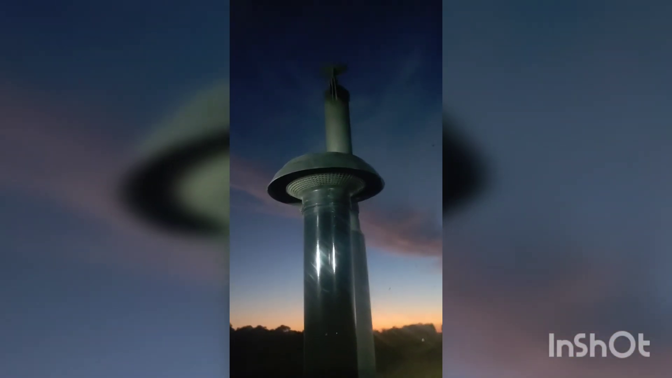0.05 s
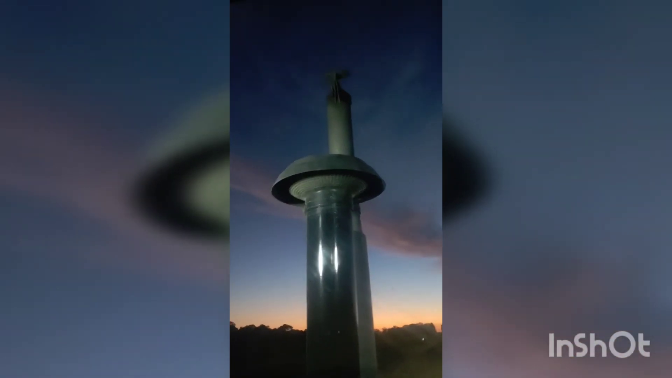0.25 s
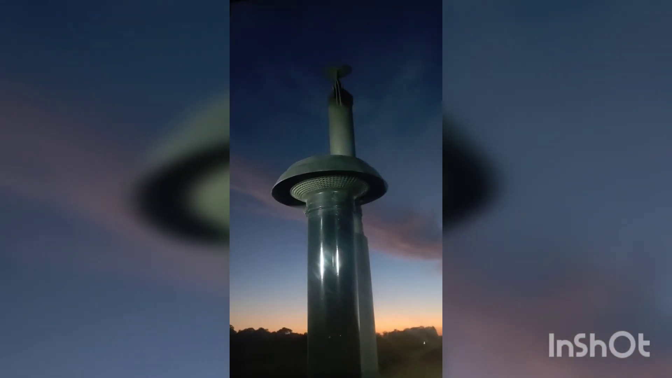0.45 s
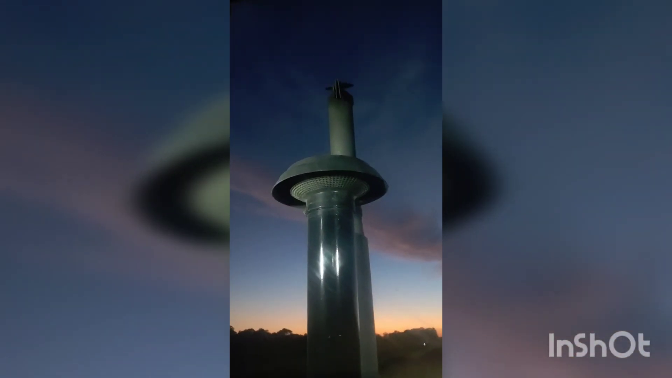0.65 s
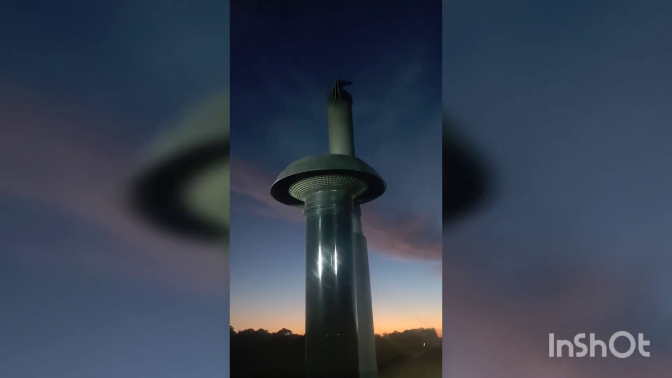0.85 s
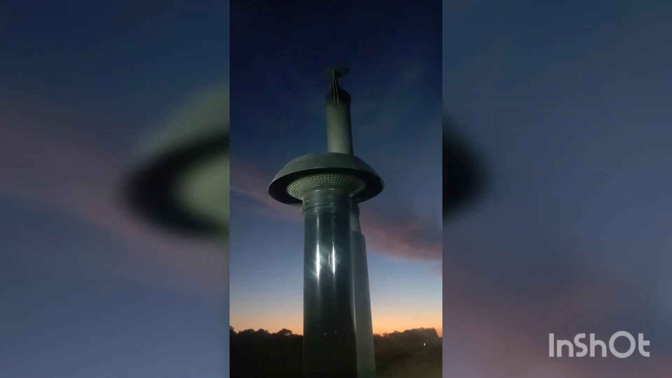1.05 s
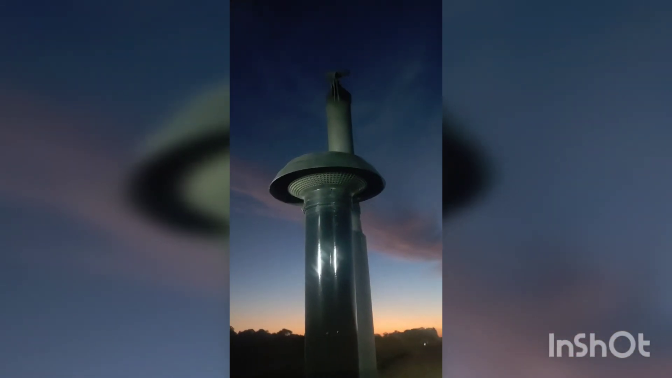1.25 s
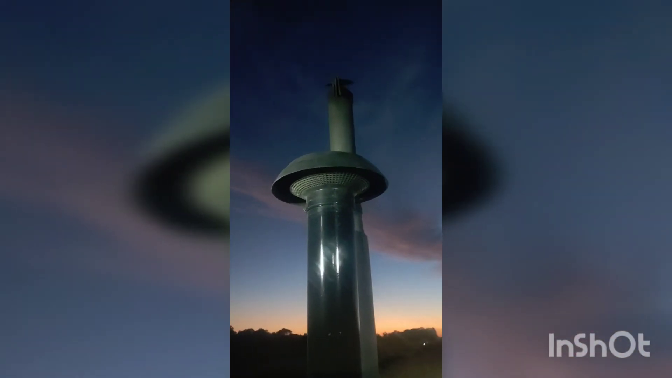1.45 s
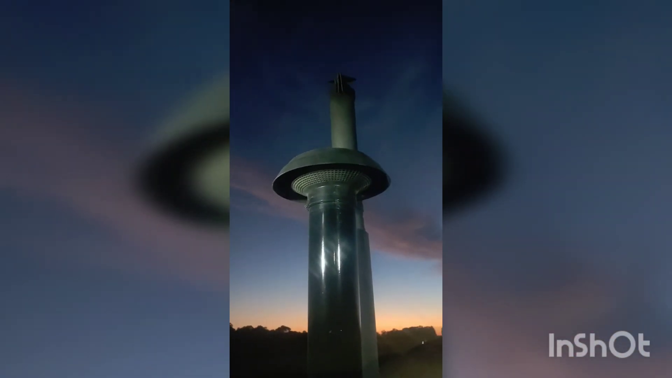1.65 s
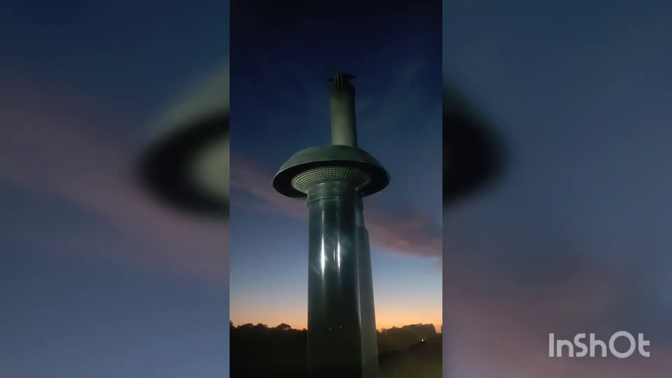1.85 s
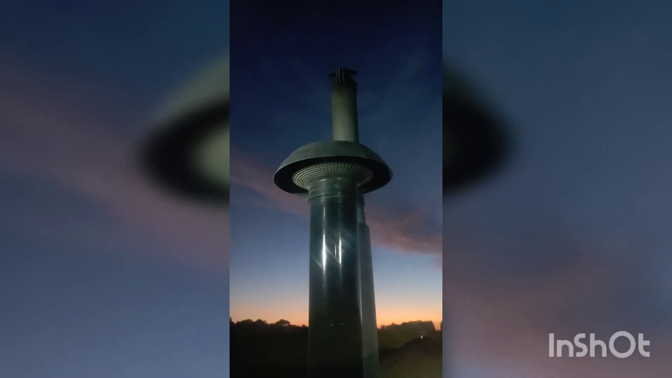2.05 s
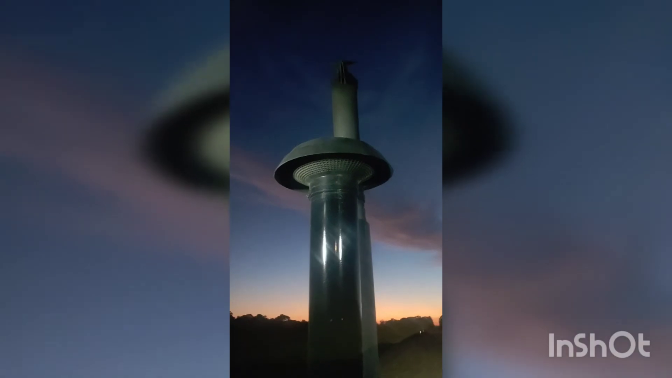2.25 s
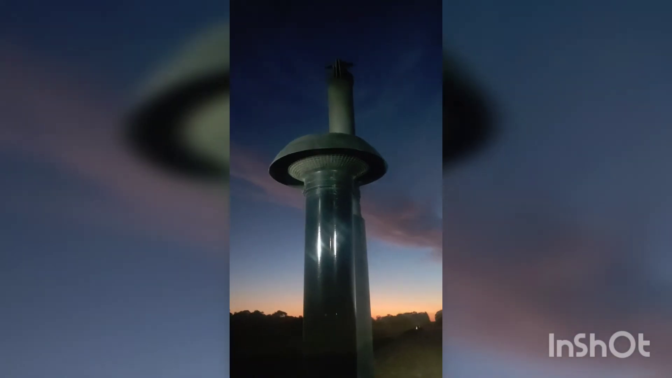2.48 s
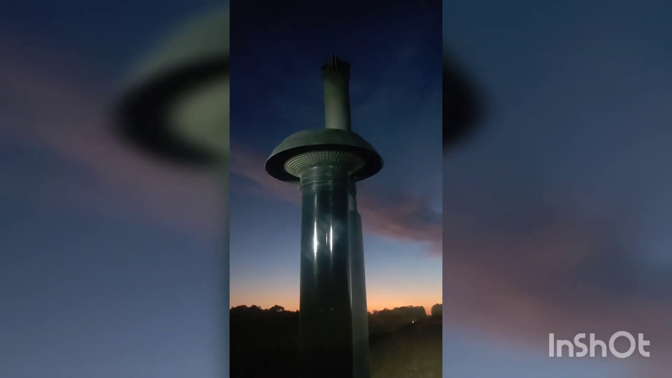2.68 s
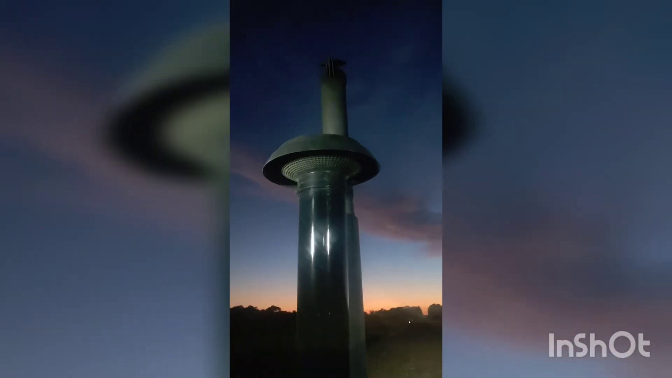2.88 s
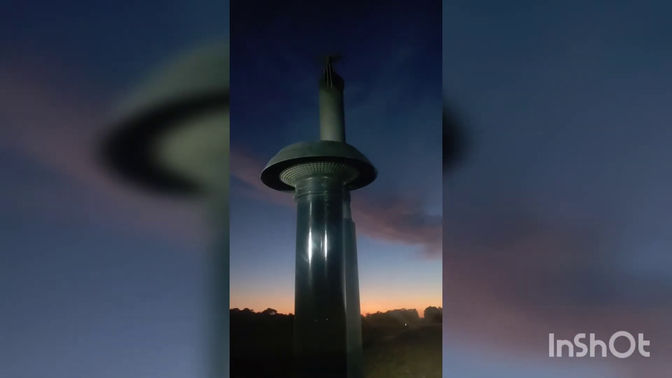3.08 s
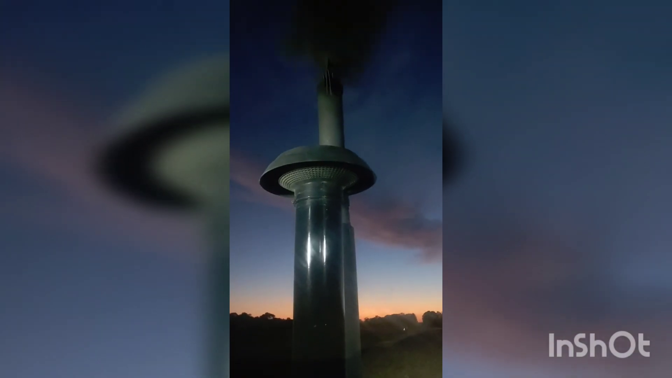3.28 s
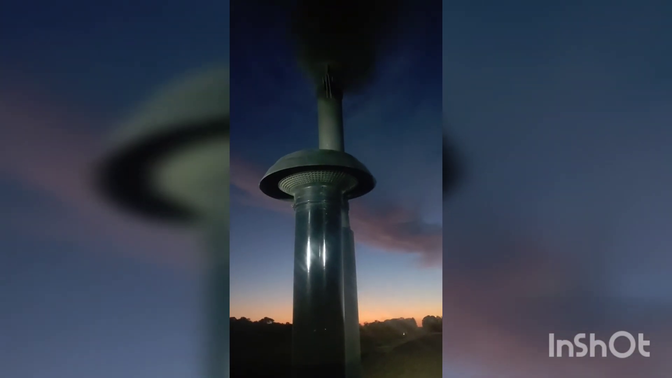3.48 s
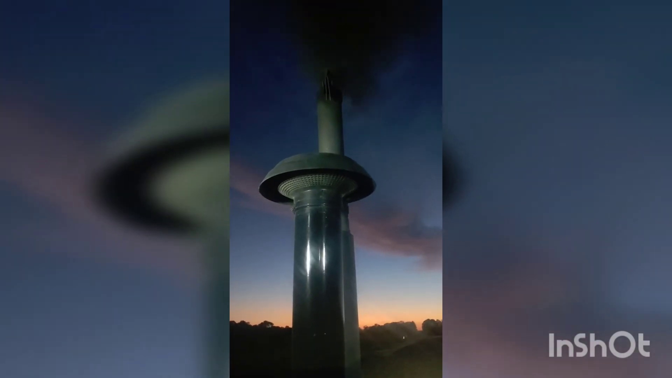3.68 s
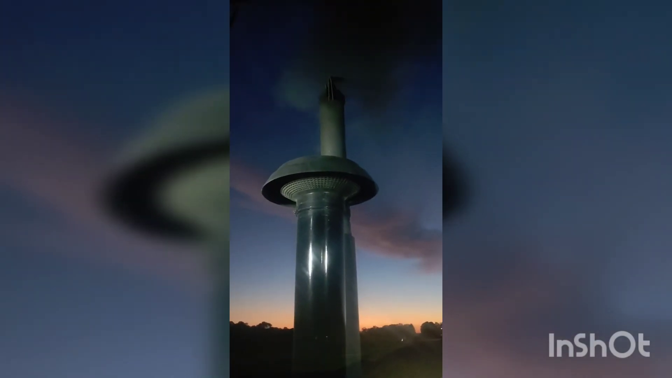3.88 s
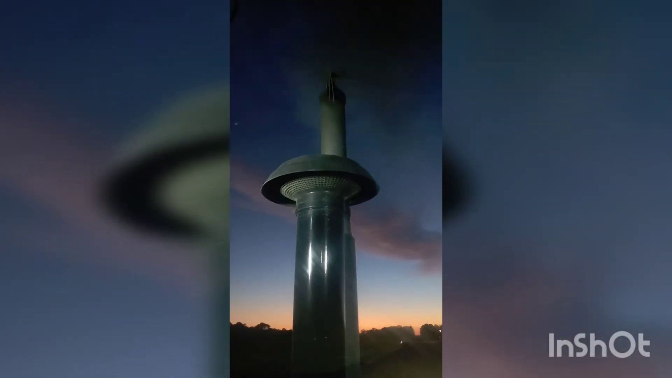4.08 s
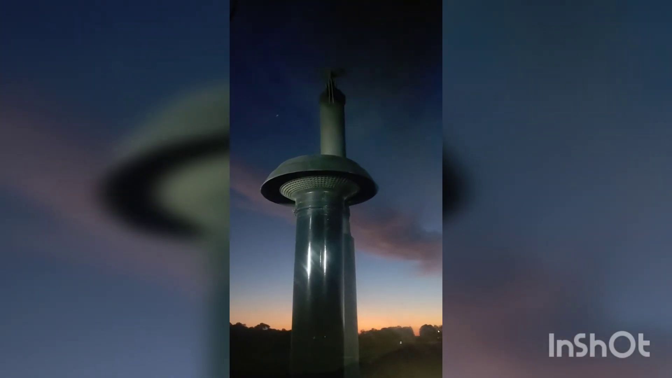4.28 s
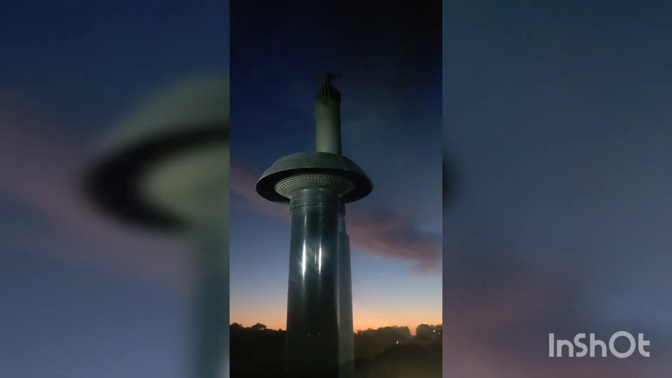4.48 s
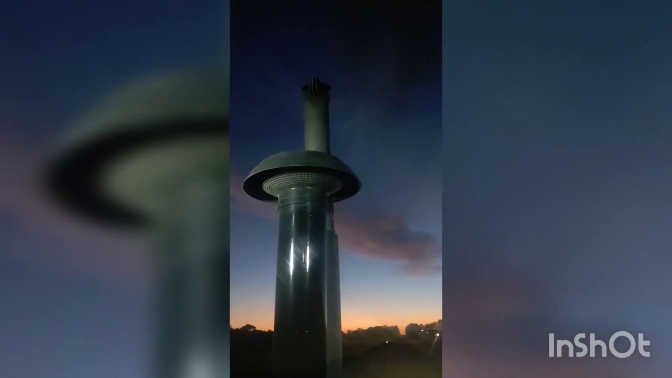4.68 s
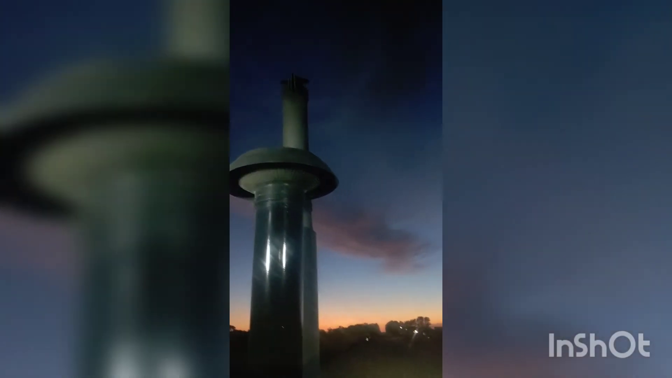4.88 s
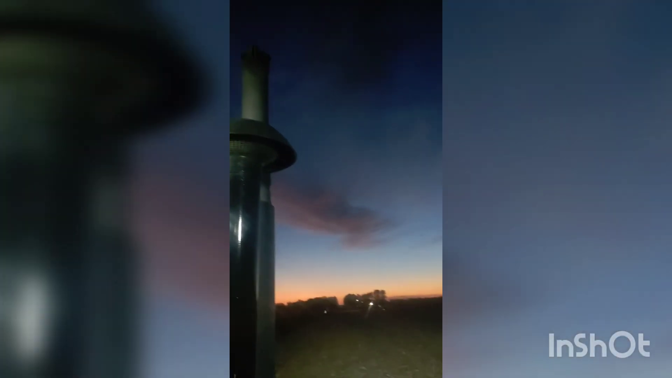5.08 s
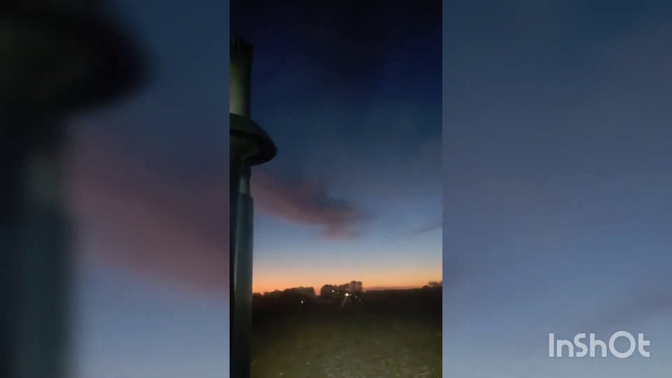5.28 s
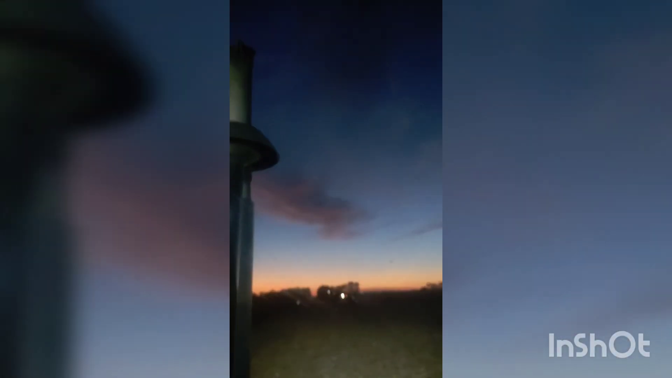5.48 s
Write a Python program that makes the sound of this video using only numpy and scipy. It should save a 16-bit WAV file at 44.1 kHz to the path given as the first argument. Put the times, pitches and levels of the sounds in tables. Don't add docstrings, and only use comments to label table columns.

```python
import sys
import numpy as np
from scipy import signal
from scipy.fft import rfft, irfft, next_fast_len
from scipy.io import wavfile
from scipy.ndimage import uniform_filter1d

SR = 44100
rng = np.random.default_rng(int(sys.argv[2]) if len(sys.argv) > 2 else 0)


def natural_amplitude(level_db):
    exponent = np.asarray(level_db, float) / 20
    return 10 ** exponent


def generate_wav(signal):
    frames = np.transpose(np.atleast_2d(signal))
    scaled = np.clip(frames, -1, 1) * 32767
    pcm = np.round(scaled).astype(np.int16)
    wavfile.write(sys.argv[1], SR, pcm)


N = 244314
TIME = np.arange(N) / SR
HZ = np.fft.rfftfreq(next_fast_len(N + 8192), 1 / SR)

# t/s, f/Hz
FIRING_RATE = [(0.0, 37.2), (0.25, 43.48), (0.5, 48.63), (0.7, 48.02), (1.05, 46.6), (1.6, 46.08),
               (2.0, 38.65), (2.4, 40.04), (3.04, 40.19), (3.12, 44.2), (3.62, 73.4), (3.75, 77.2),
               (3.88, 76.0), (4.25, 66.4), (4.75, 55.0), (5.25, 44.4), (5.54, 38.7)]
# t/s, level/dB
FUELLING = [(0, 18), (.18, 20), (.34, 17.5), (.57, 11.5), (.75, 8), (1.0, 12), (1.552, 10.5), (1.74, 4.5),
            (1.99, 15.5), (3.031, 14.5), (3.1, 18.5), (3.3, 18), (3.58, 15.5), (3.69, 13), (3.74, 5),
            (3.82, 0), (5.35, -4.5), (5.54, 14)]
# coasting at 44 Hz firing rate level/dB, per octave of speed level/dB, per dB of fuelling
# level/dB
KNOCK_LAW = (-56, 26.7, 1.032)
CLATTER_LAW = (-79, 37.4, 1.14)
BEAT_LAW = (-69.5, 13, 1.6)
BOOM_LAW = (-31.5, 12.2, 0.19)
WHINE_LAW = (-55, 20, .05)
INTAKE_LAW = (-105, 63, .05)

ORDERS = [2, 3, 4, 5, 6, 7, 8, 9, 10, 11, 12, 13, 14, 15, 15.75, 16, 17, 18, 18.5, 19, 21]
ORDER_LEVELS = [-11, -32, -15, -8.5, -0.5, -3, 2, 2, -7, -9.5, -6.5, -6, -3, 0.5, -1, 4, 5, -16, -7, -9, 0]
# f/Hz, level/dB
CAB_SLOPE = [(25, -38), (60, -9.5), (100, -3), (200, -7.5), (290, -12), (420, -23.5), (800, -41)]
# f/Hz, width/Hz, lift/dB
CAB_MODES = [(104.5, 11, 10.5), (126.8, 15.9, 15.5), (145.4, 8.5, 13), (179.8, 20, 14), (210, 28, -0.5),
             (247.9, 23.2, 16), (264.2, 5.2, 9.5), (335.4, 7, 3), (383, 30, 6.5)]

CYLINDER_LEVELS = [-7, -26, -9.5, -17, -12, -20]
# f/Hz, level/dB (per Hz)
BLOCK = [(120, -26.5), (200, -2), (375, -12.5), (439, -11.5), (601, -5.5), (804, -10), (1020, -3.5),
         (1290, -9), (1940, -18), (2630, -17.5), (3600, -34.5), (4680, -89.5), (7920, -120)]
# f/Hz, width/Hz, lift/dB
BLOCK_MODES = [(495, 20, -3), (611.2, 10, 11.5), (1020, 29, 2.5), (1191, 18, 8), (1288, 18.4, 10),
               (1500, 46, 10.5), (1810, 68, 3.5), (2140, 20, 7), (2700, 31, 11)]
# f/Hz, level/dB (per Hz)
HEAD = [(1940, -31.5), (3300, -0.5), (3860, -5), (4480, -4.5), (5370, -5.5), (6530, 3), (7830, -5),
        (9100, -6), (11100, -12), (15600, -28)]
# f/Hz, width/Hz, lift/dB
HEAD_MODES = [(4150, 82, 11), (4490, 120, 8.5), (5030, 90, -1), (5500, 54, -1), (6700, 76, 0.5),
              (8010, 120, 8.5), (9500, 53, 7), (11260, 71, 8.5)]
# f/Hz, level/dB
FUEL_LINES = [(3800, -29), (4400, -4), (4800, -3), (5200, -0.5), (5600, -3.5), (6100, -5), (7500, -30)]

# f/Hz, level/dB
TICK = [(4000, -25), (8000, -21), (10000, 2), (11800, 2), (13000, -1), (14000, -20), (15500, -30)]
TICK_SLOTS = [-2, -11, -13, -6, -20, -20]
# f/Hz, level/dB
CLACK = [(3500, -24), (4500, -3), (5100, 1.5), (5700, -12), (7500, -29)]
CLACK_SLOTS = [-13, 0, -14, -14, -8.5, -11]

# f/Hz, level/dB (per Hz)
BLOWER = [(18, -25), (40, -18), (90, -10.5), (150, -16), (240, -3.5), (420, -15), (500, -11), (830, -18),
          (1270, -23), (1910, -23.5), (2230, -22), (3490, -34), (11700, -57), (15600, -53.5)]
# f/Hz, width/Hz, lift/dB
DUCT_MODES = [(315.3, 15.7, 5), (480.9, 14.4, 9), (519.5, 70, 4.5), (708.6, 23, 8.5), (1761, 47, 7.5),
              (2195, 38, 8), (2240, 60, 11), (2443, 127, 7.5), (2533, 27, 9.5), (6050, 130, 17),
              (6880, 100, 14), (9730, 120, 6)]
# f/Hz, level/dB (per Hz)
INTAKE = [(5000, -21), (8000, 6), (11000, -6), (13500, -7), (15600, -14)]
# f/Hz, width/Hz, level/dB
SINGING = [(5920, 40, -66), (9520, 50, -70), (10400, 60, -84), (12680, 30, -73)]

# f/Hz, share/1
LIKENESS = [(45, .995), (70, .93), (130, .98), (290, .84), (640, .62), (1400, .4), (3000, .36),
            (15000, .31)]
# f/Hz, level/dB
PORT_TILT = [(30, -8), (60, 10), (110, 2), (200, 0.5), (380, -4.5), (700, 0.5), (1290, -2.5), (2380, -11.5),
             (4400, -2), (8120, 0), (15000, -10)]
# f/Hz, t/s
LEFT_LAG = [(60, 0.000058), (700, 0.0002), (1800, 0.0004), (15000, 0.000366)]
# f/Hz, width/Hz, lift/dB
LEFT_PORT = [(464, 40, 0.5), (736, 62, 2.5), (3080, 480, 9.5), (7930, 360, -11)]
# f/Hz, width/Hz, lift/dB
RIGHT_PORT = [(431, 22, -5.5), (744, 48, -10), (1456, 106, -7), (1856, 56, -7.5), (3550, 100, -3.5),
              (4740, 190, -6), (9450, 300, 2.5), (10070, 680, 5), (11900, 800, 6.5)]


def level(x, db):
    return x * natural_amplitude(db) / np.sqrt(np.mean(x ** 2))


def on_hz(points):
    hz, value = np.transpose(points)
    return np.interp(np.log(HZ + 1), np.log(hz), value)


def through(x, gain):
    size = 2 * len(HZ) - 2
    return irfft(rfft(x, size) * gain, size)[..., :N]


def body(x, points, modes=()):
    db = on_hz(points)
    for hz, width, lift in modes:
        db = db + lift / (1 + (2 * (HZ - hz) / width) ** 2)
    cepstrum = irfft(db * np.log(10) / 20)
    cepstrum[1:len(HZ) - 1] *= 2
    cepstrum[len(HZ):] = 0
    return through(x, np.exp(rfft(cepstrum)))


def walk(rate, count=1):
    hold = int(SR / rate)
    steps = np.repeat(rng.standard_normal((count, N // hold + 1)), hold, axis=1)
    smooth = uniform_filter1d(uniform_filter1d(steps, hold), hold)
    return 1.18 * smooth[:, :N]


def orders(turns, rows, wobble_db, drift):
    waves = np.empty((len(rows), N), complex)
    for wave, (multiple, db) in zip(waves, rows):
        swell, slip = walk(5, count=2)
        phase = 2 * np.pi * multiple * turns + drift * slip
        wave[:] = natural_amplitude(db + wobble_db * swell) * np.exp(1j * phase)
    path_phase = np.exp(2j * np.pi * rng.random((3, len(rows))))
    return np.real(path_phase @ waves)


def law(rule, firing_hz, fuel_db):
    base_db, per_octave_db, per_fuel = rule
    reference_hz = 44
    return base_db + per_octave_db * np.log2(firing_hz / reference_hz) + per_fuel * fuel_db


def over(db, floor_db):
    return 10 * np.log10(natural_amplitude(db) ** 2 + natural_amplitude(floor_db) ** 2)


def boom(turns, boom_db, beat_db):
    octaves = np.clip(np.log2(3 * SR * np.gradient(turns) / 47), 0, 1)
    rows = list(zip(ORDERS, ORDER_LEVELS))
    rows += [(k + .5, -15 + 9 * octaves) for k in range(3, 18)]
    shaft = orders(turns, rows, wobble_db=2.5 + 4 * octaves, drift=.3 + .8 * octaves)
    cab = level(body(shaft, CAB_SLOPE, CAB_MODES), 0) * natural_amplitude(boom_db)
    beat = np.sqrt(2) * np.sin(2 * np.pi * 3 * turns) * natural_amplitude(beat_db - 4.5)
    return cab + beat * np.array([[1], [0], [0]])


def knock(turns, knock_db, clatter_db, steady=.5, burst=.3, scatter_db=1.5):
    firing = 3 * turns
    which = firing.astype(int)
    scatter = scatter_db * rng.standard_normal(N // 100)
    size = natural_amplitude(np.array(CYLINDER_LEVELS)[which % 6] + scatter[which])
    strength = steady + size * np.exp(-(firing % 1) / burst)
    blows = strength * rng.standard_normal((3, N))
    block = level(body(blows, BLOCK, BLOCK_MODES), 1.25) * natural_amplitude(knock_db)
    head = level(body(blows, HEAD, HEAD_MODES), 0.17) * natural_amplitude(clatter_db)
    injectors = level(body(blows, FUEL_LINES), -38.0) * natural_amplitude(1.53 * (knock_db + 22))
    return block + head + injectors


def slots(turns, fuel_db, late, base_db, slots_db, scatter_db, shift_s=99):
    valve_phase = .11
    quiet_below_db = 8.5
    place = 6 * (turns / 2 - valve_phase - late) + 6
    at = np.flatnonzero(np.diff(np.floor(place))) + 1
    slot = place[at].astype(int) - (TIME[at] > shift_s)
    scatter = scatter_db * rng.standard_normal(N // 100)[:len(at)]
    db = base_db + np.array(slots_db)[slot % 6] + scatter
    return zip(TIME[at], db + 1.1 * np.minimum(fuel_db[at] - quiet_below_db, 0))


def taps(events, colour, decay_s, lift_db, rise_s=.0015):
    envelope = np.zeros(N)
    for s, db in events:
        envelope[int(s * SR)] = natural_amplitude(db + lift_db)
    envelope = signal.lfilter([1], [1, -np.exp(-1 / (decay_s * SR))], envelope)
    envelope = uniform_filter1d(envelope, int(rise_s * SR))
    return envelope * level(body(rng.standard_normal((3, N)), colour), 0)


def valves(turns, fuel_db):
    ticks = slots(turns, fuel_db, 0, -56, TICK_SLOTS, scatter_db=1.5)
    clacks = slots(turns, fuel_db, .045, -59.5, CLACK_SLOTS, scatter_db=3.0, shift_s=1.7)
    tick = taps(ticks, TICK, decay_s=0.01, lift_db=-4)
    return tick + taps(clacks, CLACK, decay_s=0.028, lift_db=1)


def pump(turns, firing_hz, whine_db):
    casing_hz, casing_width_hz, wander_hz = 2212, 120, 4
    top_db, patchy_db = -52, 1.1
    teeth = 142.3
    wander, patch = walk(9, count=2)
    cycles = np.cumsum(casing_hz + wander_hz * wander) / SR
    whine = orders(cycles, [(1, 0)], wobble_db=2.5, drift=.8)
    near = 1 / (1 + (2 * (teeth * firing_hz / 3 - casing_hz) / casing_width_hz) ** 2)
    gear = orders(turns, [(teeth, -47)], wobble_db=2.5, drift=.6)
    return whine * natural_amplitude(np.minimum(whine_db, top_db) + patchy_db * patch) + gear * near


def blower(turns, firing_hz, repeat=0.74, size=1024):
    pattern = rng.standard_normal((3, size))
    place = turns % 1 * size
    rustle = np.array([np.interp(place, np.arange(size), p, period=size) for p in pattern])
    air = natural_amplitude(1.0 * walk(12)) * (rng.standard_normal((3, N)) + repeat * rustle)
    return level(body(air, BLOWER, DUCT_MODES), -37) * natural_amplitude(6.9 * np.log2(firing_hz / 45))


def intake(air_db):
    rush = level(body(rng.standard_normal((3, N)), INTAKE), 0)
    return rush * natural_amplitude(air_db + 1.5 * walk(8.4))


def singing(firing_hz, fuel_db, knee_hz=63, soft_hz=5):
    on = 1 / (1 + np.exp((knee_hz - firing_hz) / soft_hz))
    rings = np.zeros((3, N))
    for hz, width, db in SINGING:
        resonance = 1 / (1 + 2j * (HZ - hz) / width)
        rings += level(through(rng.standard_normal((3, N)), resonance), db)
    return on * rings * natural_amplitude(-.4 * fuel_db)


def ports(paths):
    direct, scattered_left, scattered_right = paths
    share = np.clip(on_hz(LIKENESS), 0, 1)
    tilt = natural_amplitude(on_hz(PORT_TILT) / 2)
    late = np.exp(-2j * np.pi * HZ * on_hz(LEFT_LAG))
    left = through(direct, tilt * late * np.sqrt(share))
    left += through(scattered_left, tilt * np.sqrt(1 - share))
    right = through(direct, np.sqrt(share) / tilt)
    right += through(scattered_right, np.sqrt(1 - share) / tilt)
    flat = [(20, 0), (20000, 0)]
    return np.array([body(left, flat, LEFT_PORT), body(right, flat, RIGHT_PORT)])


def scene():
    firing_hz = np.interp(TIME, *np.transpose(FIRING_RATE))
    fuel_db = np.interp(TIME, *np.transpose(FUELLING))
    turns = np.cumsum(firing_hz) / (3 * SR)
    beat_db = over(law(BEAT_LAW, firing_hz, fuel_db), -52)
    clatter_db = over(law(CLATTER_LAW, firing_hz, fuel_db), -61.5)
    cab = boom(turns, law(BOOM_LAW, firing_hz, fuel_db), beat_db)
    cab += knock(turns, law(KNOCK_LAW, firing_hz, fuel_db), clatter_db)
    cab += valves(turns, fuel_db)
    cab += pump(turns, firing_hz, law(WHINE_LAW, firing_hz, fuel_db))
    cab += blower(turns, firing_hz)
    cab += intake(law(INTAKE_LAW, firing_hz, fuel_db))
    cab += singing(firing_hz, fuel_db)
    return ports(cab)


def low_pass(x):
    return signal.sosfilt(signal.butter(12, 15750, fs=SR, output="sos"), x)


def record(dry):
    return low_pass(dry)


dry = scene()
out = record(dry)
generate_wav(out)
```